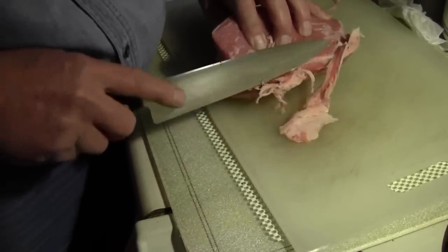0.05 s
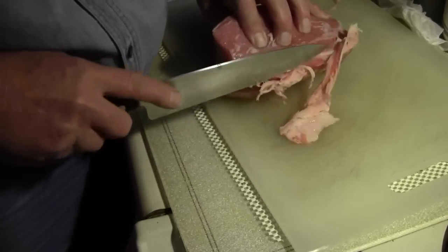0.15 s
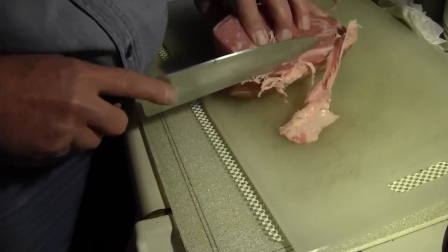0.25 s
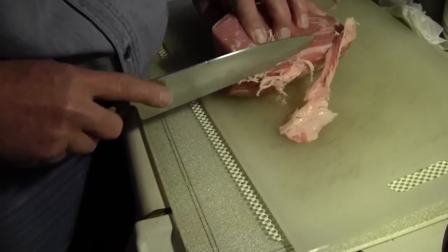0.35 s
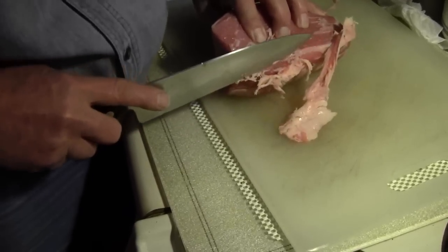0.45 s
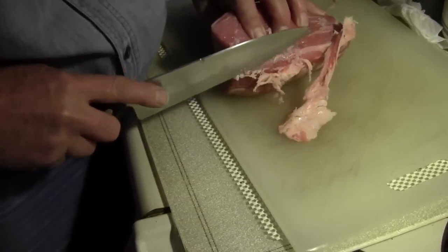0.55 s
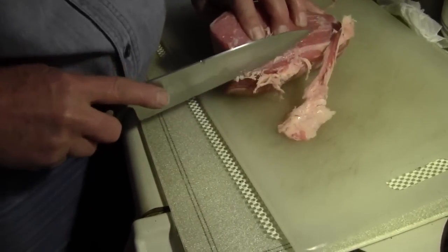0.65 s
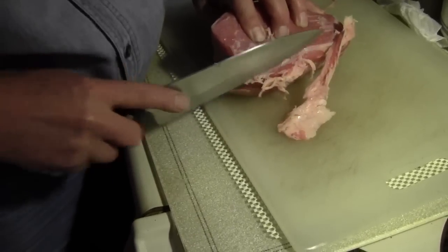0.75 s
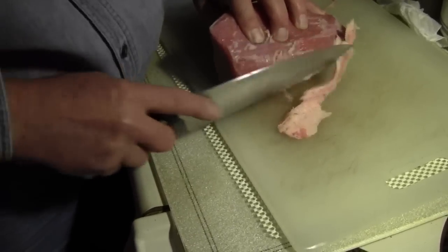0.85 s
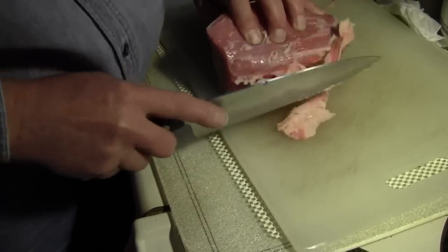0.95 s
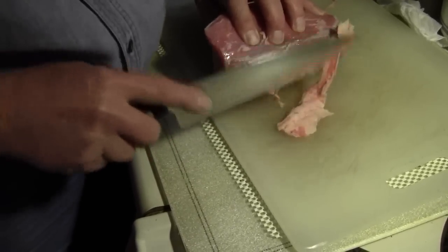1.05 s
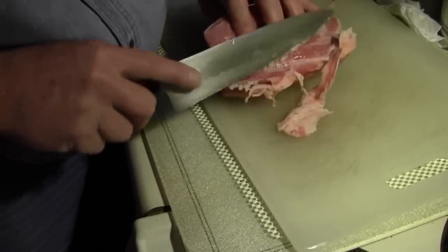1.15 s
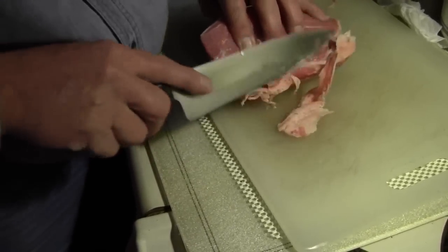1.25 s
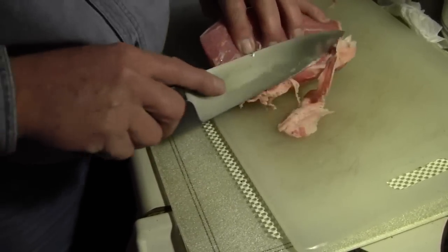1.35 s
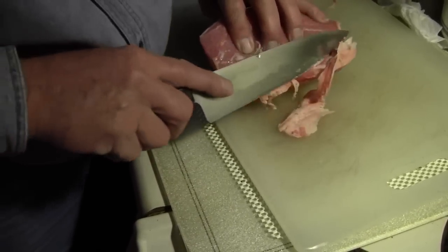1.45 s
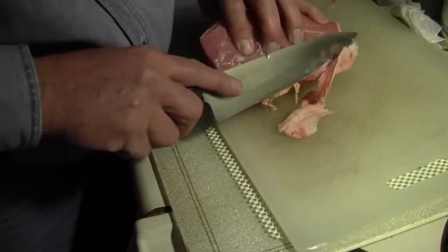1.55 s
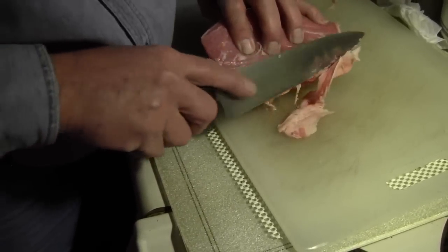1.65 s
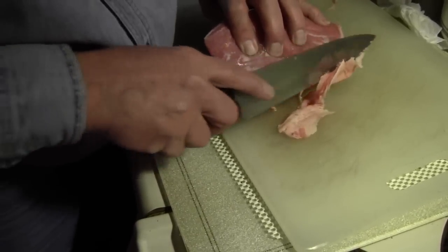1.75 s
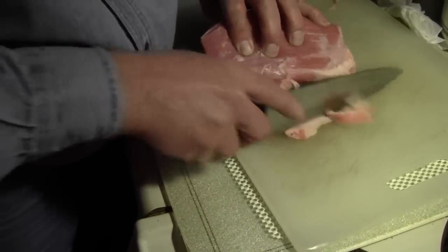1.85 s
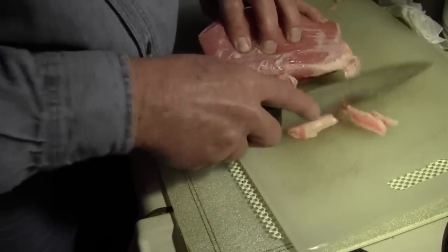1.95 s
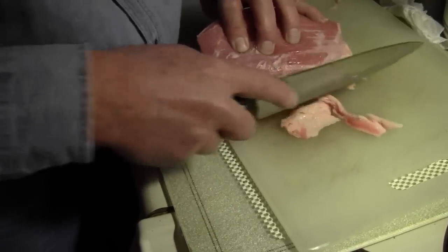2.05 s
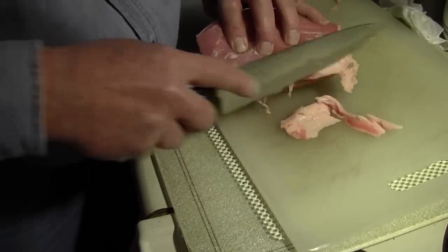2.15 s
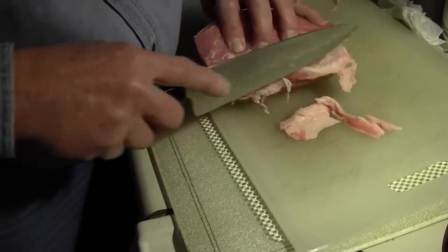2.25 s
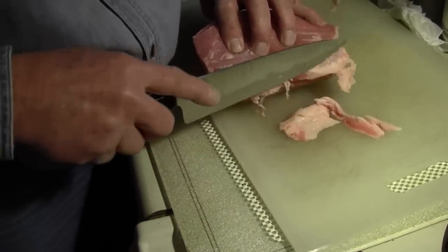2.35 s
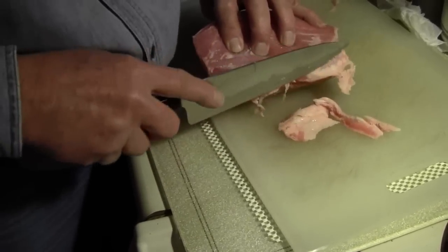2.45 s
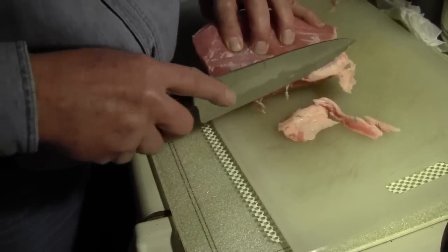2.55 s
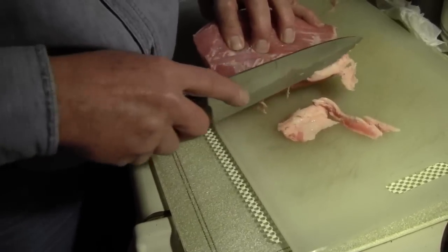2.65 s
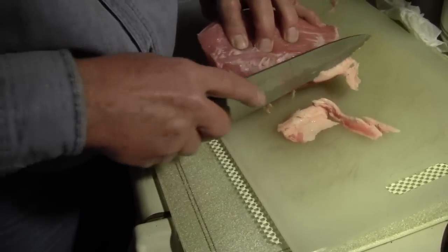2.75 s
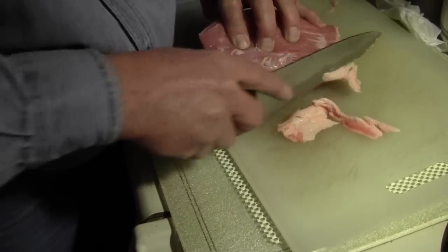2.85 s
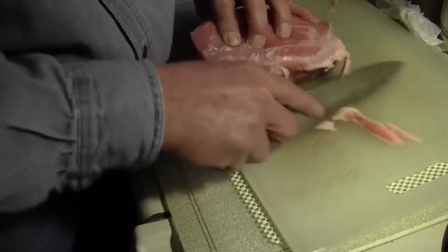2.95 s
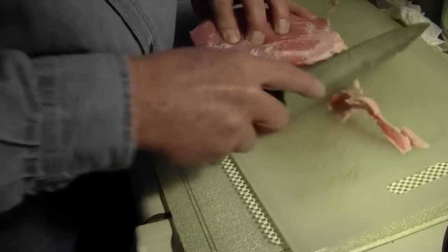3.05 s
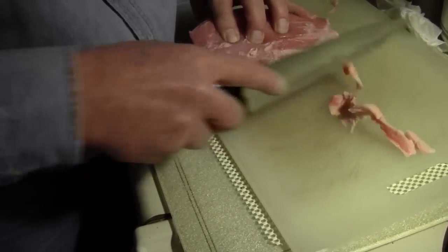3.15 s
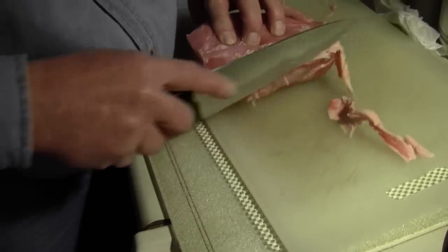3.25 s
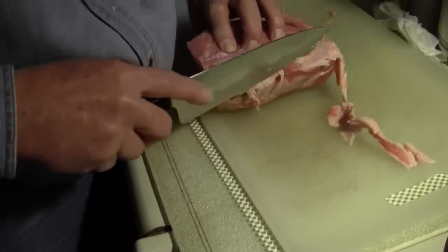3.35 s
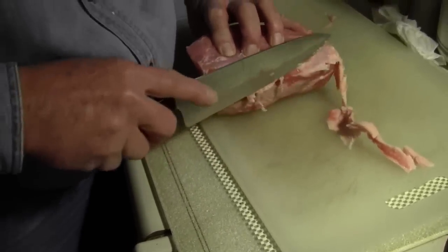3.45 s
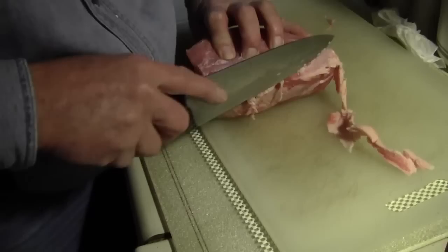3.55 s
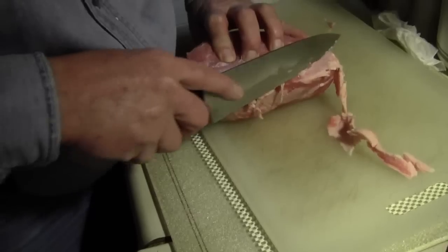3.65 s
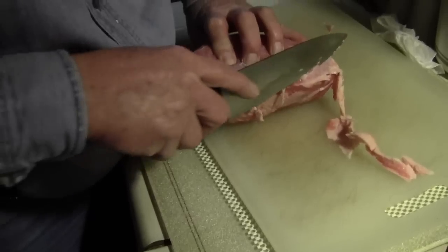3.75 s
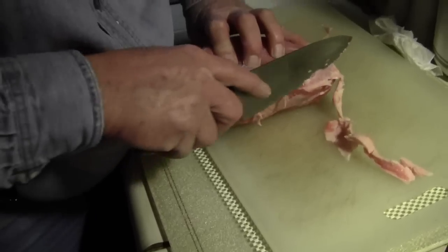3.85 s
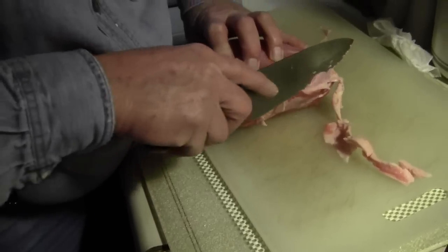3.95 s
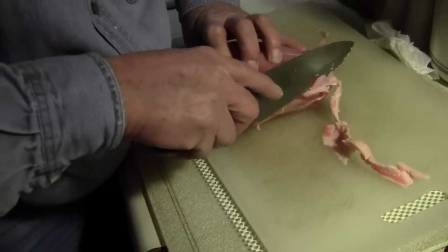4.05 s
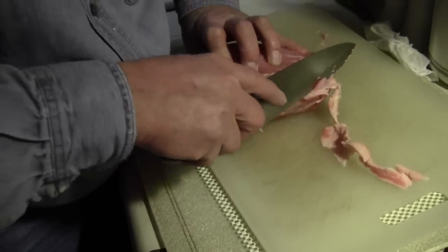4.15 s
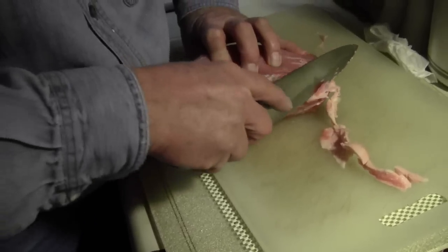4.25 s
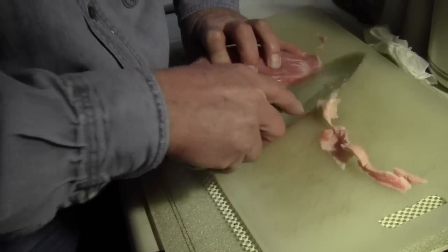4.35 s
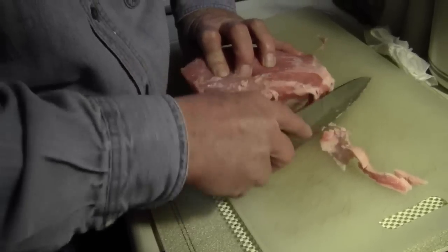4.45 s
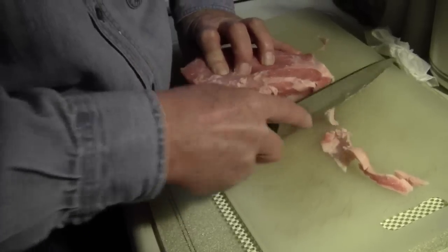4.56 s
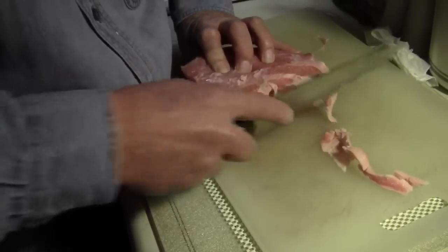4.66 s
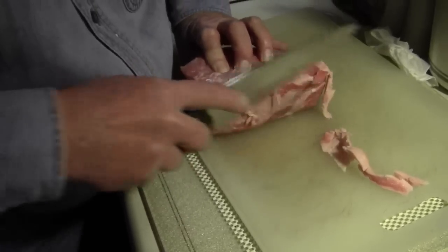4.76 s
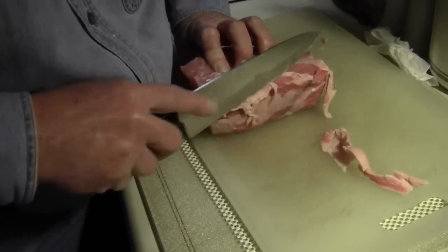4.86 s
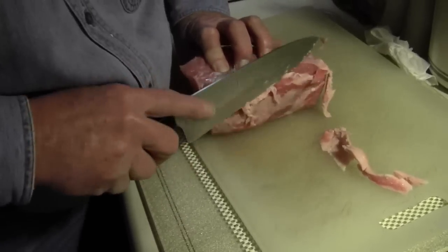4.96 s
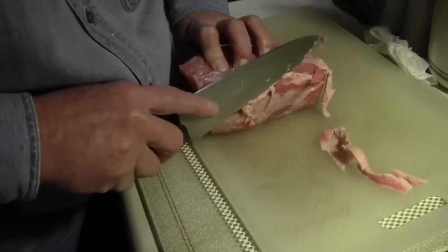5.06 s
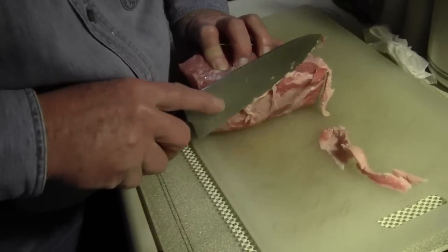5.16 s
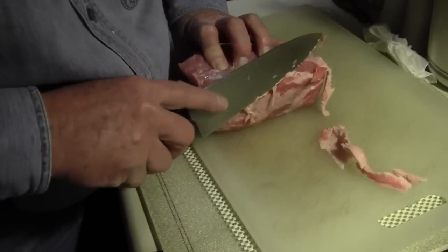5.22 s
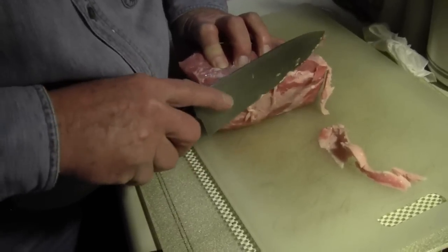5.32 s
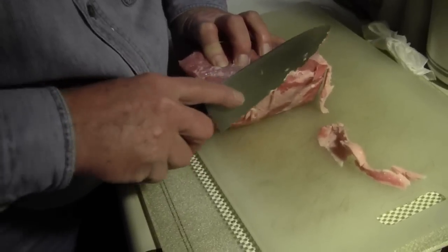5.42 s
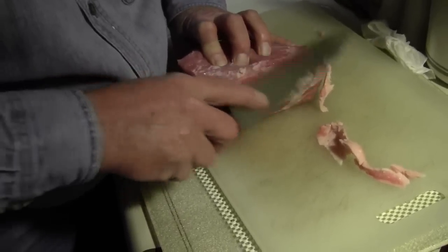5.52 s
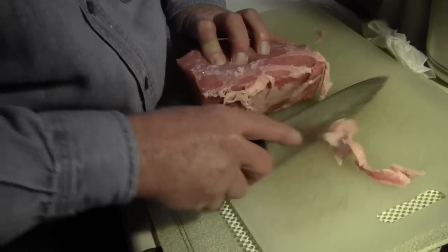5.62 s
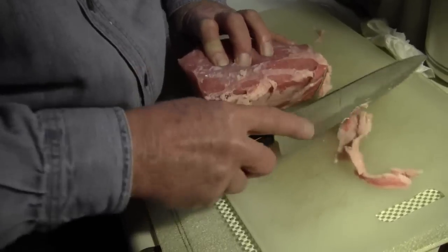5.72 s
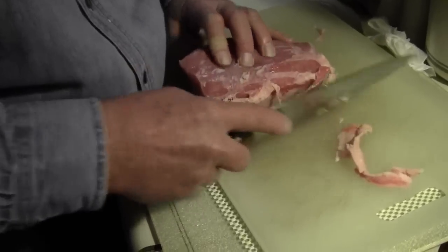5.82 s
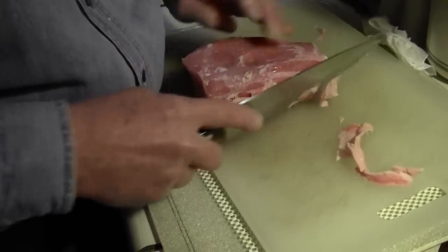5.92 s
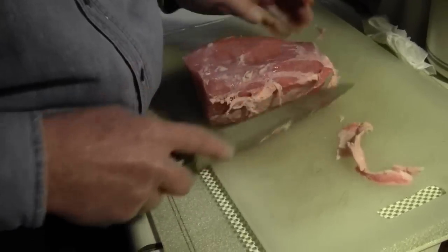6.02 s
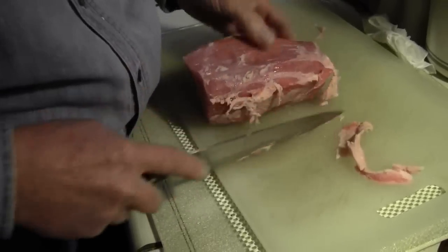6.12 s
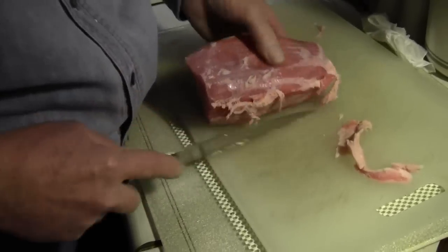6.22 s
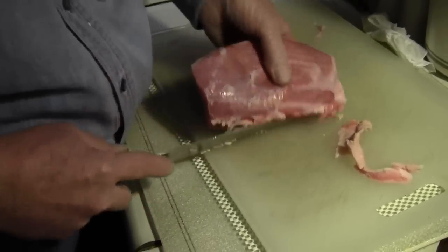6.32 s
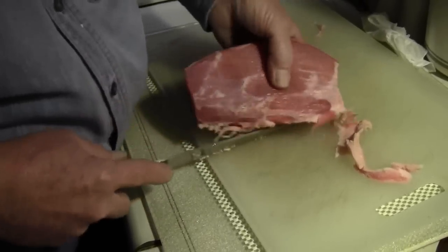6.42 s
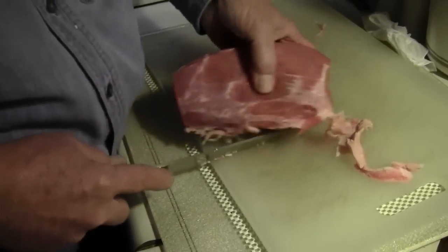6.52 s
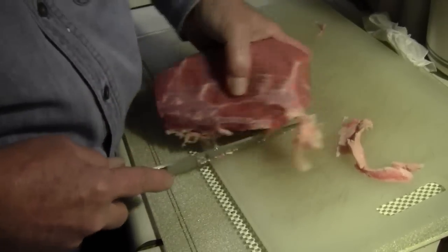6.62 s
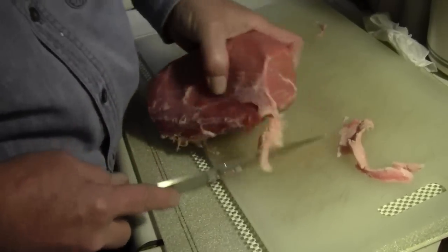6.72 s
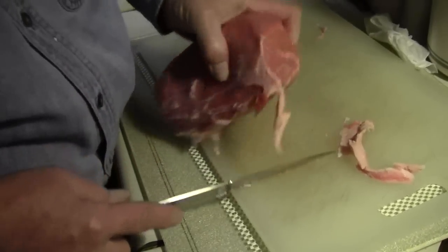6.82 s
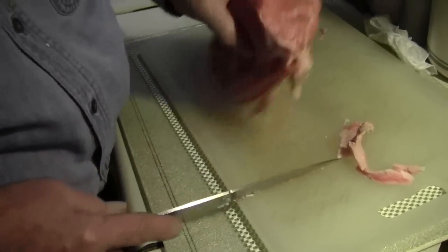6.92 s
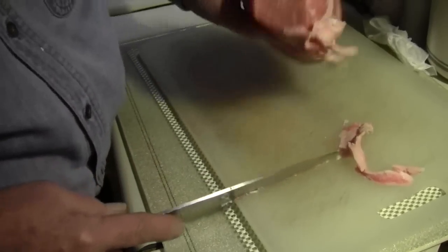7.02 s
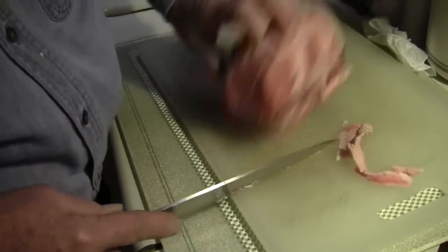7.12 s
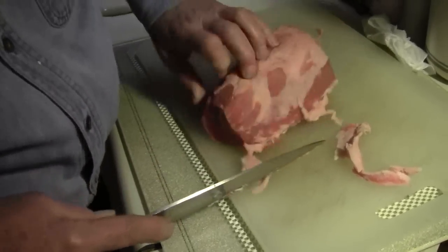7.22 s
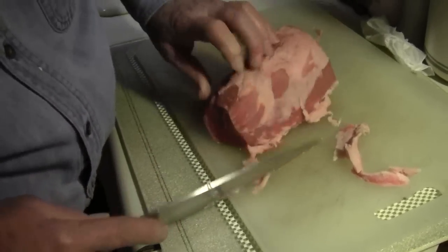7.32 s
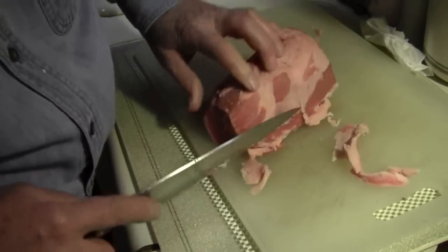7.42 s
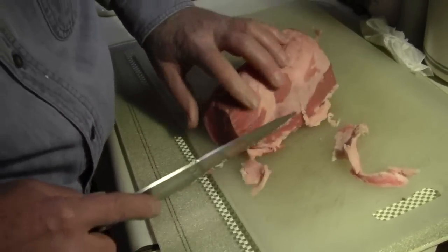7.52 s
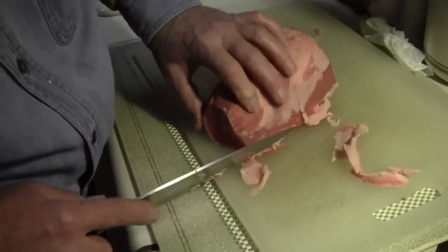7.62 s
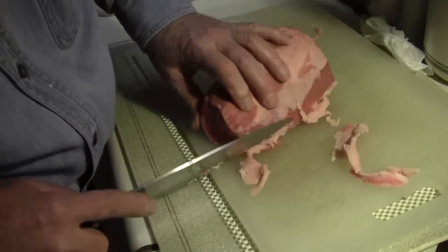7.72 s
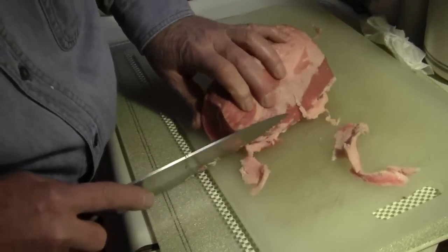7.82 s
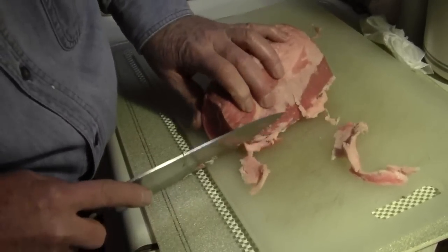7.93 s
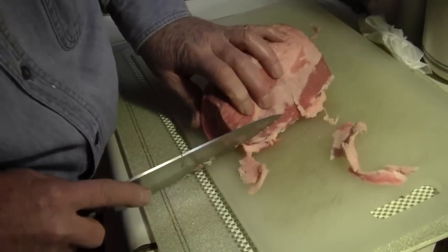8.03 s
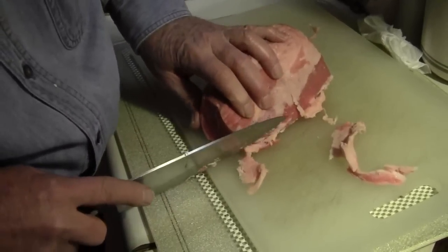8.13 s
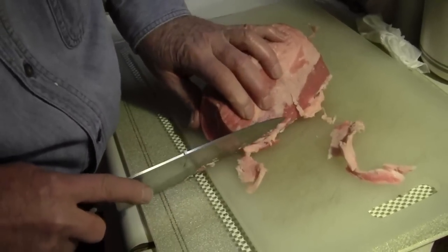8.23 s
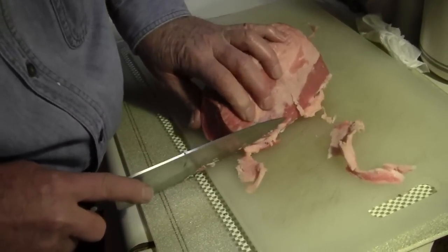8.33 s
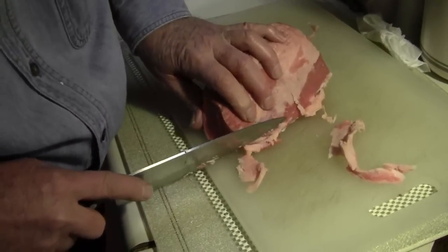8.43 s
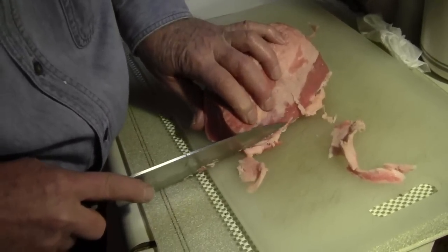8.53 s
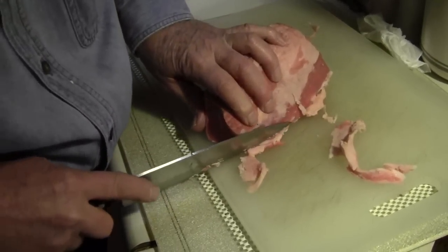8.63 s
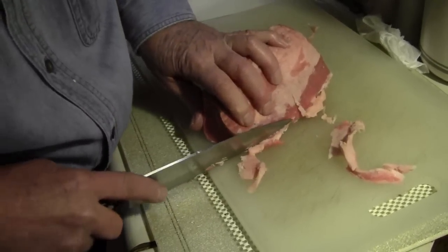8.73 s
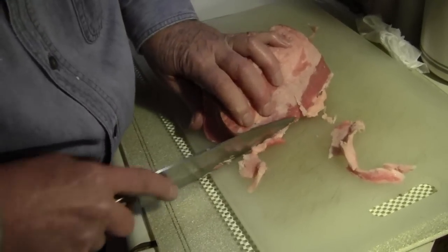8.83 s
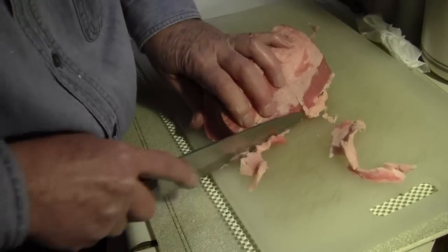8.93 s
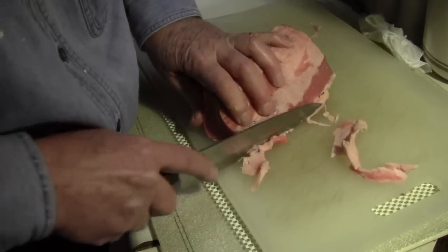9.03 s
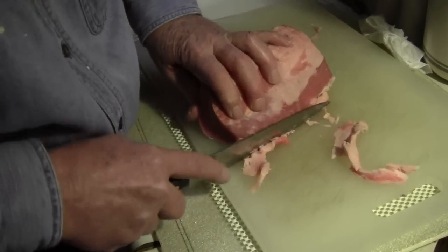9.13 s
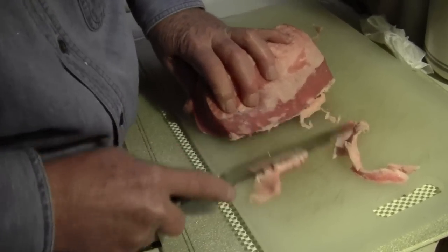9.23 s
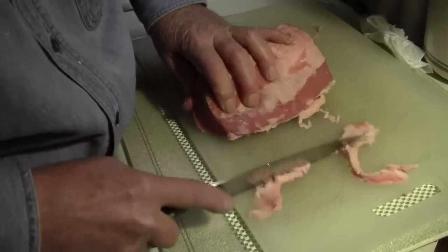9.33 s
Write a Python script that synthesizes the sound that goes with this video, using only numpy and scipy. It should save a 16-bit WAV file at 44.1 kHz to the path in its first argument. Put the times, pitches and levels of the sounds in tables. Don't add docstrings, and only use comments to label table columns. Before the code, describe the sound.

A large knife knocks hard on a plastic board while trimming meat, with soft wet rustles, small ticks and a fridge hum behind.

```python
import sys
import numpy as np
from scipy import signal
from scipy.io import wavfile
from scipy.ndimage import uniform_filter1d

SR = 44100
rng = np.random.default_rng(int(sys.argv[2]) if len(sys.argv) > 2 else 0)


def invert_db(level):
    return 10 ** (np.asarray(level, dtype=float) / 20)


def transcribe(signal):
    frames = np.atleast_2d(signal).T
    limited = np.clip(frames, -1, 1)
    pcm = np.round(limited * 32767).astype(np.int16)
    wavfile.write(sys.argv[1], SR, pcm)


N = 413658

# [t/s, peak/dB, snap/dB]
KNOCKS = [
    (2.0286, 7, -22.5),
    (3.077, 3.5, -21),
    (4.569, 6, -22.5),
]
# [f/Hz, t60/s, level/dB in blow 1, 2, 3]
BOARD_MODES = [(250, 0.029, -32.5, -1.5, -9), (292, 0.0261, -20.5, -33.5, -50.5),
               (506, 0.12, -3.5, -15, -39), (537, 0.046, -17.5, -9, -42), (764, 0.08, -2.5, 2, -6),
               (850, 0.15, -27.5, -17.5, -36), (980, 0.06, -15.5, -10.5, -17), (1104, 0.044, 13, 6.5, 0),
               (1210, 0.012, 23.5, 14, 1), (1290, 0.076, 7, 1.5, 0), (1500, 0.036, -27.5, -15.5, 0.5),
               (1764, 0.013, 19.5, 13, 8.5), (1980, 0.03, 16.5, 7.5, 2), (2314, 0.074, 19.5, 6.5, 5),
               (2454, 0.015, 18.5, 6, 4), (2643, 0.02, 17, -13.5, -2), (2948, 0.033, 17, 6, -43),
               (3527, 0.012, -12.5, 0, -19), (4440, 0.015, -17.5, -12.5, -8.5), (5040, 0.008, -2, 3.5, -6),
               (5450, .015, -30, -48, -19), (6390, .01, -26, -47, -56)]
# [delay/s, level/dB, cutoff/Hz]
ECHOES = [
    (.0033, -7, 2640),
    (.0075, -5.5, 1405),
    (0.0099, -9, 1816),
    (0.014, -15, 2226),
]
# [t/s, peak/dB, f/Hz, t60/s, crack/dB]
DROP = [
    (7.325, -20.5, 1980, 0.033, 13),
    (7.332, -7, 1220, 0.056, -4.5),
    (7.337, -10.5, 764, 0.072, 1),
    (7.349, -10.5, 716, 0.076, -9),
    (7.357, -18, 727, 0.03, -12),
    (7.3675, -9, 1500, 0.044, 4.5),
    (7.388, -9, 1230, 0.018, 1.5),
    (7.3935, -5, 1787, 0.056, 3.5),
    (7.403, -11.5, 1110, 0.11, -18),
    (7.411, -25.5, 1130, 0.034, 10.5),
]
# [t/s, peak/dB, f/Hz, t60/s, crack/dB]
TICKS = [(3.382, -40, 504, 0.05, -11), (3.392, -36, 974, 0.098, -21.5), (4.774, -40, 659, 0.077, 0.5),
         (4.821, -42, 800, 0.099, 5), (4.836, -32, 930, 0.056, -20), (6.337, -27, 580, 0.079, -5),
         (6.389, -40, 1230, 0.13, 4), (6.404, -47, 1040, 0.052, 9), (6.644, -36, 1050, 0.092, 3),
         (6.946, -44, 1140, 0.14, 4), (7.698, -39, 393, 0.044, -17), (8.245, -47, 588, 0.2, -25),
         (8.332, -48, 472, 0.045, -17), (8.825, -51, 1980, 0.057, -18), (8.941, -32, 1210, 0.035, 8),
         (8.9635, -32.5, 1210, 0.1, 7), (9.276, -40, 3500, 0.048, -10), (9.327, -25, 1180, 0.053, -37)]
# [t/s, peak/dB, f/Hz, t60/s, crack/dB]
SCUFFS = [(7.558, -35, 2410, 0.076, -3), (8.105, -43, 560, 0.11, -25), (8.12, -43.5, 850, .1, -30),
          (8.14, -51.5, 1150, .08, -24), (8.275, -50, 800, .1, -20), (9.009, -35, 1130, 0.048, -2),
          (9.066, -41, 1100, 0.074, -10), (9.077, -39, 750, 0.09, -8), (9.09, -41, 1300, .08, -11),
          (9.104, -43, 1900, .06, -8), (9.296, -43, 2850, 0.041, -10), (2.0258, -34, 900, .1, -6),
          (3.074, -34, 1100, .1, -6), (4.5652, -40, 900, .1, -4), (6.643, -36, 1500, .05, -4),
          (6.946, -44, 1500, .05, -2)]
# [t/s, peak/dB, f/Hz, t60/s]
JOLTS = [(2.0293, -8, 3000, 0.0076), (2.0325, -13, 1500, 0.013), (2.0294, -12.5, 750, 0.0065),
         (2.044, -14, 900, .012), (2.048, -15, 1150, 0.013), (4.82, -41.5, 2270, .03),
         (4.636, -22, 1000, 0.033), (7.351, -22, 700, 0.035), (7.408, -16, 1740, .015),
         (2.0369, -7.5, 1000, 0.03), (3.0845, -5, 996, 0.025), (3.0805, -9, 1500, .01),
         (3.0965, -16, 1150, .015), (3.105, -16, 950, .015), (4.5735, -11, 2300, .012),
         (3.091, -23.5, 2730, 0.049), (4.5765, -5, 980, 0.022), (4.572, -9.5, 2550, 0.015),
         (2.0347, -5, 2500, 0.008), (6.3375, -37, 3100, 0.011), (6.338, -38, 4180, .008),
         (6.342, -39, 1020, 0.05), (6.395, -48, 2950, .02), (6.6423, -36, 1500, 0.02),
         (6.644, -41, 1030, 0.046), (7.332, -14, 1030, .015), (7.3357, -11, 2570, 0.0089),
         (7.3668, -10.5, 1300, 0.011), (7.3684, -7, 2590, 0.022), (7.385, -7, 1250, 0.011),
         (7.3936, -5, 1675, 0.0083), (7.393, -4, 2704, 0.0065), (7.399, -22, 1250, .018),
         (7.406, -24, 1700, .02), (7.619, -50, 1554, 0.12), (7.619, -44, 2570, 0.037),
         (7.621, -54, 4330, 0.16), (7.619, -46, 3260, 0.12), (7.63, -50, 3580, .25),
         (7.666, -52, 1550, .12), (7.665, -54, 3260, 0.17), (8.941, -28, 2210, 0.0037),
         (8.942, -41, 1250, 0.027), (8.962, -25, 2600, 0.0025), (9.077, -40, 1820, 0.028),
         (9.081, -40.5, 1836, 0.057)]
# [t/s, peak/dB, f/Hz]
THUMPS = [(2.034, -28.5, 245.3), (3.082, -34.5, 179), (3.383, -48.5, 194), (5.788, -43, 172.5),
          (6.341, -36.5, 165), (7.34, -18, 317), (7.367, -32, 300), (7.41, -22.5, 250), (7.499, -37, 324),
          (7.579, -37.5, 150), (7.843, -46.5, 152), (8.258, -47.5, 318), (8.83, -45, 292),
          (8.969, -41, 294), (3.097, -33.5, 108.2), (4.587, -32, 115.8), (5.775, -38.5, 114),
          (7.396, -27.5, 102.8)]
# [t/s, peak/dB, f/Hz, t60/s]
PINGS = [(4.607, -43, 8150, .06), (4.645, -46, 8300, .05), (4.822, -42, 5650, .04), (4.836, -36, 5750, .06),
         (4.836, -42, 10750, .1), (6.338, -32, 1020, .07), (6.338, -36, 3100, .025),
         (6.642, -32, 1620, .018), (6.644, -32, 1020, .04), (7.395, -25, 2480, .09), (7.41, -31, 8160, .09),
         (7.44, -36, 8100, .09), (7.62, -41, 1555, .1), (7.619, -48, 2560, .04), (7.618, -43, 3270, .1),
         (7.62, -44, 3570, .08), (7.622, -54, 4280, .08), (7.622, -54, 5400, .06), (7.62, -53, 6680, .05),
         (7.664, -42, 1556, .1), (7.666, -49, 2600, .04), (7.665, -47, 3300, .09), (9.066, -42, 1850, .1)]
# [peak t/s, attack/s, level/dB, [f/Hz, width/Hz, level/dB]]
SING = (9.36, .02, -33, [(7000, 790, -2), (8300, 970, -3), (9300, 600, -4)])
# [peak t/s, attack/s, release/s, level/dB, brightness/dB]
SCRAPES = [(2.062, .03, .03, -58, -2.5), (2.075, .01, .015, -41.5, 12.5), (2.122, 0.08, 0.073, -70.5, -38),
           (3.098, 0.015, 0.012, -48, -17), (3.155, 0.071, 0.094, -48.5, -11),
           (4.592, 0.0085, 0.16, -46, -6.5), (4.654, 0.062, 0.016, -53.5, -19),
           (4.838, 0.015, 0.026, -44.5, -2.5), (6.45, 0.22, .08, -57, -5),
           (7.335, 0.0054, 0.013, -17.5, 3.5), (7.369, 0.0019, 0.044, -17.5, -1.5),
           (7.412, 0.017, 0.086, -28.5, -6.5), (7.54, .08, 0.65, -84, -23), (8.995, 0.02, 0.084, -50.5, 4),
           (9.085, 0.027, 0.12, -52, -11), (9.328, 0.0017, 0.25, -46, -7), (9.354, 0.018, .8, -33, -9.5)]
# [f/Hz, density/dB]
SCRAPE_LOW = [(120, -29.5), (200, -15.5), (967, -1), (1180, 3), (1930, 3.5), (2290, 0), (2500, 9.5),
              (4500, -64), (5850, -45), (9900, -120)]
SCRAPE_HIGH = [(2060, -29.5), (3500, 0.5), (4960, 4.5), (5680, -8), (6760, 0), (8090, -5), (13400, -17)]
# [t/s, length/s, foot/Hz, top/Hz, level/dB]
SQUEAK = (5.8, .26, 9900, 11900, -73)
# [t/s, peak/dB, f/Hz]
SNAPS = [(2.9894, -50, 7890), (3.0491, -57, 7540), (3.109, -44, 7390), (3.1347, -50, 7210),
         (5.6194, -49.5, 8100), (5.7088, -45, 7280), (6.6194, -50, 9230), (6.6857, -46, 8300),
         (6.7526, -39, 7150), (8.062, -40, 8380), (8.5474, -49, 6700), (8.9094, -49, 8900),
         (8.94, -26.5, 6240), (8.964, -26, 6900), (8.989, -43, 6700), (8.9994, -40, 6960),
         (9.135, -36, 8760), (9.2494, -66, 6400), (9.2968, -38, 9230)]
FIBRES = [(2.354, -46, 7010), (2.3989, -52, 8110), (2.8928, -47.5, 7200), (3.9549, -49, 7620),
          (4.0991, -50, 7560), (4.2403, -54, 8050), (4.2672, -45, 7560), (4.451, -49, 9230),
          (5.1751, -52, 7710), (8.6777, -51, 7280), (8.761, -52.5, 7040), (9.2773, -43, 10600)]
# [peak t/s, attack/s, hold/s, release/s, level/dB]
STROKES = [(0.01, 0.057, 0.016, 0.63, -64), (.54, 0.81, 0.025, 0.55, -75), (.98, 0.18, 0.033, 0.11, -55.5),
           (1.33, 0.19, 0.12, 0.49, -60.5), (1.97, 0.083, 0.03, 0.13, -49.5),
           (2.41, 0.17, 0.0087, 0.048, -73.5), (2.6, 0.29, 0.066, 0.33, -69),
           (3.05, 0.081, 0.0048, 0.019, -48.5), (3.3, 0.31, 0.12, 0.16, -69), (3.82, .06, 0.38, 0.27, -70),
           (4.42, 0.024, 0.14, 0.048, -61), (4.9, 0.054, 0.0073, 0.31, -79),
           (5.63, 0.074, 0.099, 0.32, -63.5), (5.98, 0.34, .03, 0.13, -63), (6.27, 0.1, 0.3, 0.099, -57),
           (6.7, 0.068, 0.0062, .03, -57.5), (6.75, 0.013, .01, 0.082, -61.5),
           (6.97, .1, 0.0084, 0.033, -68), (7.29, 0.18, 0.027, 0.026, -61),
           (7.63, .06, 0.017, 0.061, -62.5), (7.72, 0.073, 0.27, 0.25, -58.5),
           (8.27, 0.051, 0.0091, 0.053, -63.5), (8.678, .01, 0.0024, .03, -70.5),
           (8.92, 0.23, 0.019, 0.06, -81), (9.18, 0.36, 0.096, .03, -63.5)]
# [peak t/s, attack/s, release/s, level/dB]
SHIFTS = [(.3, 0.95, 1, -61), (.99, 0.22, 0.23, -56), (1.33, 0.15, 1, -59.5), (2.0, 0.15, 0.26, -63),
          (2.701, 0.83, .5, -61), (3.05, 0.13, 0.18, -60.5), (3.3, .3, 0.49, -62), (4.1, 0.99, 0.58, -64),
          (4.9, 0.31, 0.43, -61), (5.86, 0.49, 0.57, -53), (6.33, 0.069, 0.27, -74.5),
          (6.48, 0.27, 0.23, -56), (6.97, 0.24, 0.019, -64), (7.31, 0.25, 0.11, -76.5),
          (7.7, 0.73, 0.62, -49.5), (8.27, 0.14, .25, -66), (8.93, 0.17, 0.59, -56.5)]
# [f/Hz, density/dB]
RUSTLE_TONE = [(3530, -7.5), (6000, -7.5), (7030, -6.5), (9080, 8), (10800, -2.5), (12300, -2),
               (13400, -10)]
# [peak t/s, attack/s, hold/s, release/s, level/dB]
CLOTH = [
    (1.32, .05, .2, .3, -78),
    (4.45, .05, .1, .05, -73),
    (6.27, .06, .33, .05, -66),
    (7.75, .06, .3, .1, -70),
]
# [f/Hz, width/Hz, level/dB, t60/s]
CUPBOARD = [
    (708, 40, -20, .4),
    (980, 90, -15, .36),
    (1090, 40, -22, 0.44),
    (1747, 36, -26.5, .35),
    (2452, 80, -23, 0.33),
]
# [f/Hz, t60/s]
ROOM_T60 = [(100, 0.38), (300, 0.59), (800, 0.39), (2000, 0.41), (4500, 0.33), (10000, .2)]
# [f/Hz, level/dB]
ROOM_LEVEL = [(100, -13.5), (400, -14), (670, -15), (950, -11.5), (1350, -15), (1900, -15.5), (2700, -17.5),
              (5000, -19), (10000, -28)]
# [f/Hz, side minus mid/dB]
SPREAD = [(60, -22), (110, -12.5), (200, -9), (360, -3), (650, -1), (1190, -5.5), (2160, -7), (3920, -19.5),
          (4800, -55.5), (13000, -55)]
# [f/Hz, rms/dB]
HUM = [(118.4, -65.5), (236.9, -71), (479.1, -71), (586.8, -68.5), (764.4, -72.5), (877.5, -73.5),
       (1125, -69.5), (1287, -73), (1992, -67)]
# [f/Hz, density/dB]
AIR = [(15, -32), (25, -0.5), (91, 0.5), (121, -3), (146, -10), (175, -3), (451, -7), (587, -19.5),
       (635, -12), (1130, -9), (1590, -20.5), (1970, -11.5), (2430, -17), (4940, -25.5), (13400, -42)]

EDGES_HZ = 25 * 2 ** np.arange(0, 9.4, .5)
FLIGHT_S = .0013


def unit(x):
    return x / np.sqrt(np.mean(x ** 2) + 1e-20)


def peak_one(x):
    return x / np.abs(x).max()


def at_hz(points, hz):
    f_hz, value = np.array(points).T
    return np.interp(np.log(hz), np.log(f_hz), value)


def decay(n, t60_s):
    return invert_db(-60 * np.arange(n) / SR / t60_s)


def cut(x, hz, kind):
    return signal.sosfilt(signal.butter(2, hz, kind, fs=SR, output="sos"), x)


def ring(force, hz, t60_s):
    r, w = invert_db(-60 / (t60_s * SR)), 2 * np.pi * hz / SR
    return signal.lfilter([0, np.sin(w)], [1, -2 * r * np.cos(w), r * r], force + 1e-18)


def peak(x, hz, width_hz):
    r, w = np.exp(-np.pi * width_hz / SR), 2 * np.pi * hz / SR
    return signal.lfilter([(1 - r * r) / 2, 0, (r * r - 1) / 2], [1, -2 * r * np.cos(w), r * r], x)


def drift(rate_hz):
    r = np.exp(-80 * np.pi * rate_hz / SR)
    slow = signal.lfilter([1], [1, -2 * r, r * r], rng.standard_normal(N // 40 + 2002))[2000:]
    return np.interp(np.arange(N) / 40, np.arange(len(slow)), unit(slow))


def grains(grain_db):
    return invert_db(grain_db * np.minimum(rng.exponential(1, N), 3.5))


def gestures(rows):
    t = np.arange(0, N + 20, 20) / SR
    gain = np.zeros(len(t))
    for s, up, hold, down, db in rows:
        before = (s - t) / max(up, 1e-3)
        after = (t - s - hold) / max(down, 1e-3)
        gain += invert_db(db - 17 * np.maximum(np.maximum(before, after), 0))
    return np.interp(np.arange(N) / SR, t, gain)


def add(out, s, sound):
    i = round((s + FLIGHT_S) * SR)
    out[i:i + len(sound)] += sound[:N - i]


def bands(sources, span_hz=(0, 1e5)):
    for k, (low, high) in enumerate(zip(EDGES_HZ, EDGES_HZ[1:])):
        if span_hz[0] < low < span_hz[1]:
            yield np.sqrt(low * high), cut(sources[k % 2], [low, high], "band")


def stereo(mid, side, hz, narrow_db=0):
    return mid + invert_db(at_hz(SPREAD, hz) + narrow_db) * side * [[1], [-1]]


def coloured(spectrum, flicker_db, grain_db, span_hz):
    white = rng.standard_normal((2, 2, N)) * grains(grain_db)
    together = drift(1.083)
    out = np.zeros((2, N))
    for hz, band in bands(white, span_hz):
        level_db = at_hz(spectrum, hz) + flicker_db * (together + drift(14.0))
        out += invert_db(level_db) * stereo(*band, hz)
    return unit(out)


def knocks():
    out = np.zeros(N)
    for k, (s, peak_db, snap_db) in enumerate(KNOCKS):
        body = np.zeros(8000)
        for hz, t60, *db in BOARD_MODES:
            click = np.eye(1, 8000, round(.014 / np.sqrt(hz) * SR))[0]
            t60 = np.clip(t60, .005, 40 / hz)
            body += invert_db(db[k]) * ring(click, hz, t60)
        body = invert_db(-2.0) * peak_one(cut(body, [480, 6000], "band"))
        snap = rng.standard_normal(8000) * decay(8000, 0.033)
        snap = peak_one(cut(cut(snap, [3000, 7500], "band"), 6200, "low"))
        add(out, s, invert_db(peak_db) * (body + invert_db(snap_db) * snap))
        for lag, db, cut_hz in ECHOES:
            add(out, s + lag, invert_db(peak_db + db) * cut(body, cut_hz, "low"))
    return out


def taps(table):
    out, n, crack_hz = np.zeros(N), 6000, 2338
    first_touch = 1 + 0.75 * np.exp(-np.arange(n) / SR / 0.0013)
    for s, peak_db, hz, t60, crack_db in table:
        noise = rng.standard_normal((2, n)) * first_touch
        body = ring(noise[0] * decay(n, max(t60, .005)), hz, 7.7 / hz)
        crack = ring(noise[1] * decay(n, max(0.8 * t60, .005)), crack_hz, 5.5 / crack_hz)
        add(out, s, invert_db(peak_db) * (peak_one(body) + invert_db(crack_db) * peak_one(crack)))
    return out


def jolts():
    out, click = np.zeros(N), np.eye(1, 12000)[0]
    for s, peak_db, hz, t60 in JOLTS:
        swell = ring(click, hz, min(0.17 * t60, 0.0095))
        add(out, s, invert_db(peak_db) * peak_one(ring(swell, hz, t60)))
    return out


def thumps():
    out = np.zeros(N)
    for s, peak_db, hz in THUMPS:
        shove = rng.standard_normal(20000) * decay(20000, 0.2)
        add(out, s, invert_db(peak_db) * peak_one(ring(shove, hz, 12.6 / hz)))
    return out


def blade():
    out = np.zeros(N)
    for s, db, hz, t60 in PINGS:
        touch = rng.standard_normal(8000) * decay(8000, t60)
        add(out, s, invert_db(db) * peak_one(ring(touch, hz, 0.35 * t60)))
    return out


def sing():
    s, up, db, peaks = SING
    noise = rng.standard_normal(N) * grains(3.4)
    steel = sum(invert_db(g_db) * peak(peak(noise, hz, w), hz, w) for hz, w, g_db in peaks)
    return gestures([(s, up, 1, 1, db)]) * unit(steel)


def scrapes():
    high = gestures([(s, up, 0, down, db) for s, up, down, db, _ in SCRAPES])
    low = gestures([(s, up, 0, down, db - bright_db) for s, up, down, db, bright_db in SCRAPES])
    bright = high * coloured(SCRAPE_HIGH, 1.5, 5.9, (1500, 2e4))
    return bright + low * coloured(SCRAPE_LOW, 0.78, 2.7, (90, 4000))


def squeak():
    s, length, foot_hz, top_hz, db = SQUEAK
    out, u = np.zeros(N), np.linspace(0, 1, round(length * SR))
    arch = np.sin(np.pi * u)
    hz = foot_hz + (top_hz - foot_hz) * arch ** 1.5
    level = invert_db(db + 4 * u + 3 * drift(40.0)[:len(u)]) * arch ** .3
    add(out, s, level * np.sin(2 * np.pi * np.cumsum(hz) / SR))
    return out


def snaps(table):
    out = np.zeros(N)
    for s, peak_db, hz in table:
        burst = rng.standard_normal(2000) * decay(2000, 0.01)
        add(out, s, invert_db(peak_db - 3) * peak_one(cut(burst, [.72 * hz, 1.35 * hz], "band")))
    return out


def rustle():
    stroke = invert_db(-74) + gestures(STROKES)
    hands = invert_db(-80) + gestures([(s, up, 0, down, db) for s, up, down, db in SHIFTS])
    grit = rng.standard_normal((2, N)) * grains(2.8)
    swish = cut(cut(grit[0], [2400, 6000], "band"), 2000, "high")
    swish = unit(swish) + invert_db(-12) * unit(ring(grit[0], 12300, 0.0052))
    dull = cut(grit[1], [220, 1200], "band")
    hiss = coloured(RUSTLE_TONE, 2.66, 3.2, (250, 2e4))
    return stroke * (hiss + invert_db(-4) * swish) + hands * unit(dull)


def cloth():
    return gestures(CLOTH) * unit(peak(peak(rng.standard_normal(N), 12500, 2400), 12500, 2400))


def cupboard(x):
    t = np.arange(SR // 2) / SR
    noise = rng.standard_normal(len(t))
    tail = sum(invert_db(db - 60 * t / t60) * unit(peak(noise, hz, width_hz)) for hz, width_hz, db, t60 in CUPBOARD)
    return signal.fftconvolve(x, tail * np.clip((t - .01) / .01, 0, 1) * invert_db(-38))[:N]


def kitchen(x):
    t = np.arange(SR // 2) / SR
    tail = np.zeros((2, len(t)))
    for hz, band in bands(rng.standard_normal((2, 2, len(t)))):
        level_db = at_hz(ROOM_LEVEL, hz) - 60 * t / at_hz(ROOM_T60, hz)
        tail += invert_db(level_db) * stereo(*band, hz, narrow_db=-14.0)
    tail = tail * np.clip((t - .008) / 0.0072, 0, 1) * invert_db(-23.5)
    return signal.fftconvolve(x[None], tail, axes=1)[:, :N]


def refrigerator():
    t, out = np.arange(N) / SR, np.zeros(N)
    for hz, db in HUM:
        level = invert_db(db + 3.0 + 28 / np.sqrt(hz) * drift(7.6))
        out += level * np.sin(2 * np.pi * hz * t + 0.662 * drift(4.2))
    return out


def air():
    return invert_db(-54 - 0.57) * coloured(AIR, 1.0, 0, (0, 2e4))


def scene():
    strikes = knocks() + 0
    strikes = cut(strikes, 110, "high") + taps(TICKS) + blade() + snaps(SNAPS)
    edge = cut(strikes, 240, "high")
    contacts = edge + cut(taps(DROP), 97, "high") + cut(thumps(), 75, "high")
    direct = (contacts + jolts()) * invert_db([[.15], [-.15]])
    friction = scrapes() + sing() + squeak() + rustle() + cloth()
    small = taps(SCUFFS) + snaps(FIBRES)
    return direct + friction + small + cupboard(edge) + kitchen(contacts) + refrigerator() + air()


def thin_top(x):
    hz, _, z = signal.stft(x, SR, nperseg=4096)
    loud_db = 10 * np.log10(np.sum(np.abs(z[0]) ** 2, axis=0) + 1e-12)
    excess_db = np.maximum(loud_db - np.median(loud_db), 0)
    mask_db = .6 * signal.lfilter([0, 1 - .55], [1, -.55], excess_db)
    patches = rng.exponential(1, (len(hz) // 20 + 1, len(loud_db)))
    spared_db = 8 * np.repeat(patches, 20, axis=0)[:len(hz)]
    slope_db = 4 * (hz[:, None] - 12300) / 1000
    limit = invert_db(-101.5 + slope_db + mask_db - spared_db)
    level = uniform_filter1d(np.abs(z.mean(axis=0)), 9, axis=0)
    weak = (level < limit) & (hz[:, None] > 8500)
    return x - signal.istft(z * weak, SR, nperseg=4096)[1][:, :N]


def top_cut(x):
    return signal.sosfilt(signal.butter(12, 13700, fs=SR, output="sos"), x)


def record(dry):
    heard = cut(cut(dry, [28, 11500], "band"), 13000, "low")
    mix = thin_top(np.clip(heard, -1, 1))
    return top_cut(mix)


dry = scene()
out = record(dry)
transcribe(out)
```